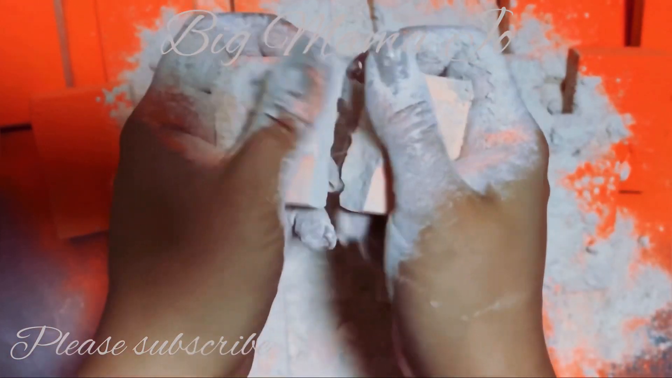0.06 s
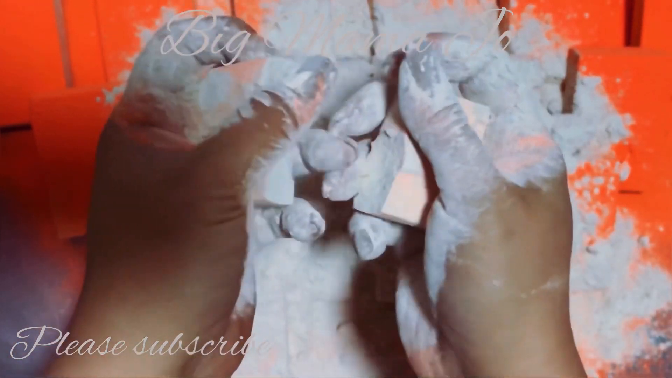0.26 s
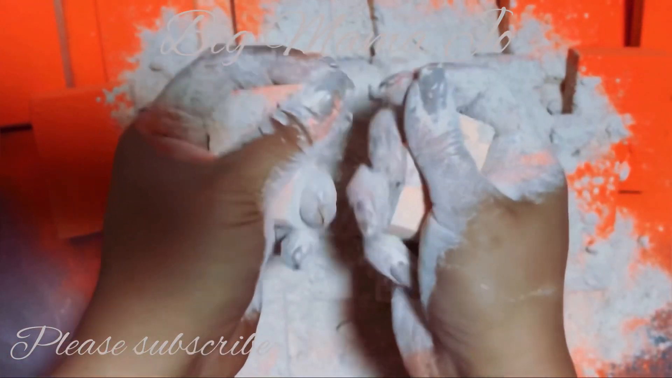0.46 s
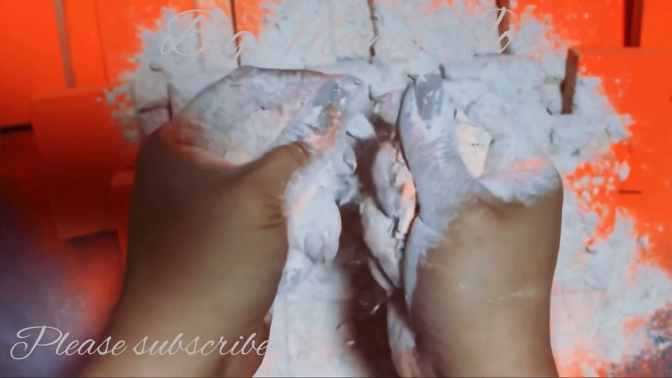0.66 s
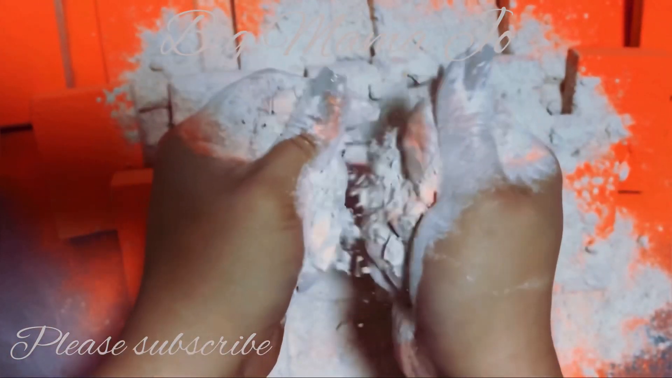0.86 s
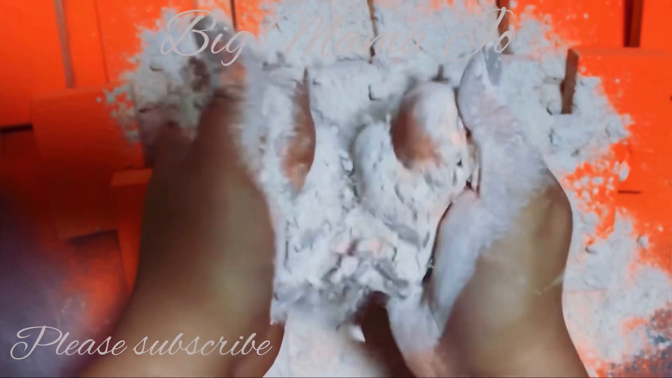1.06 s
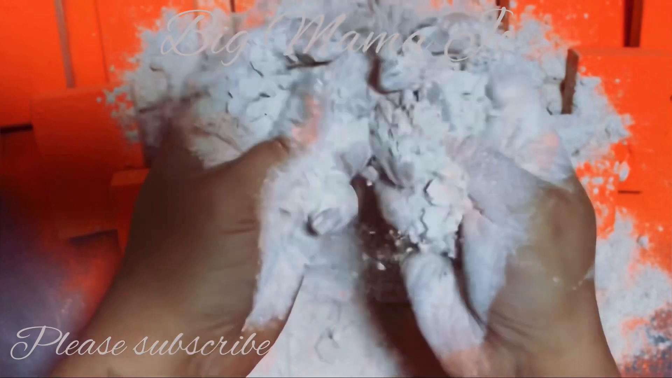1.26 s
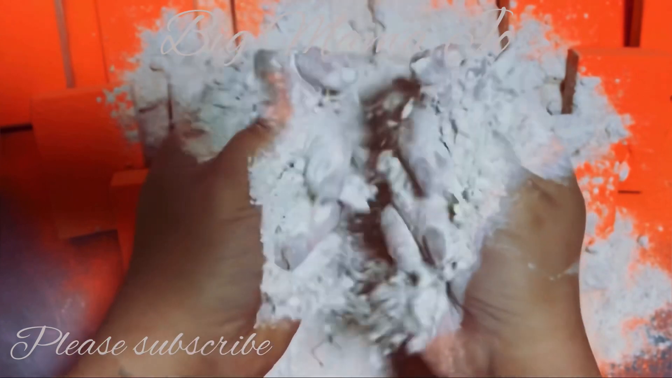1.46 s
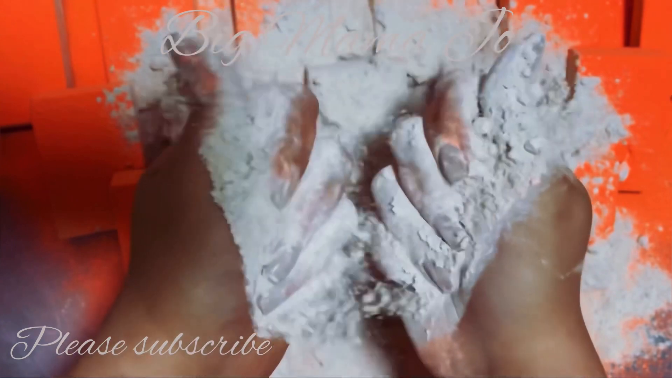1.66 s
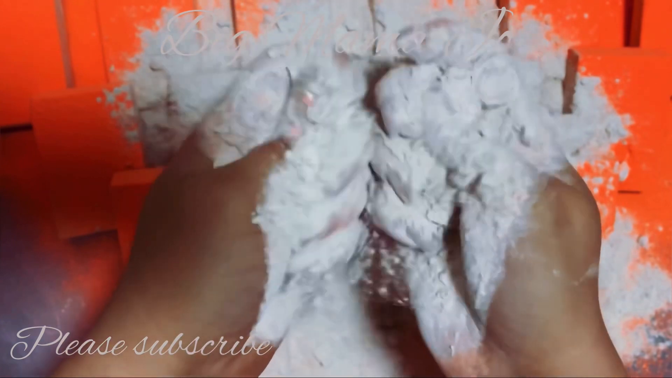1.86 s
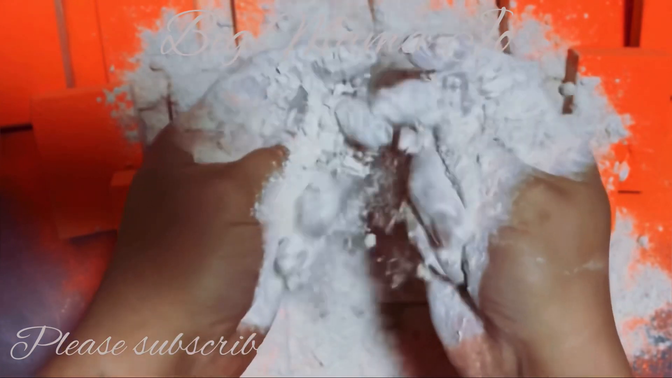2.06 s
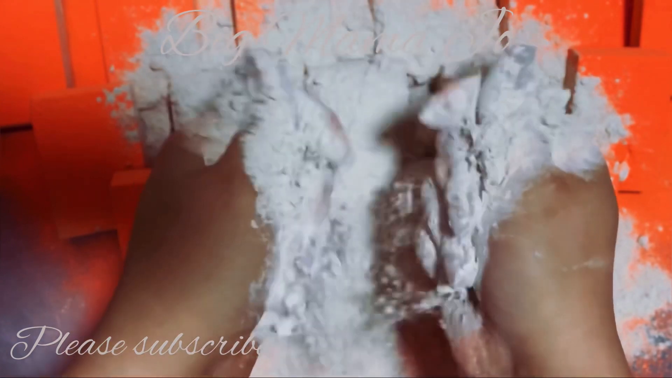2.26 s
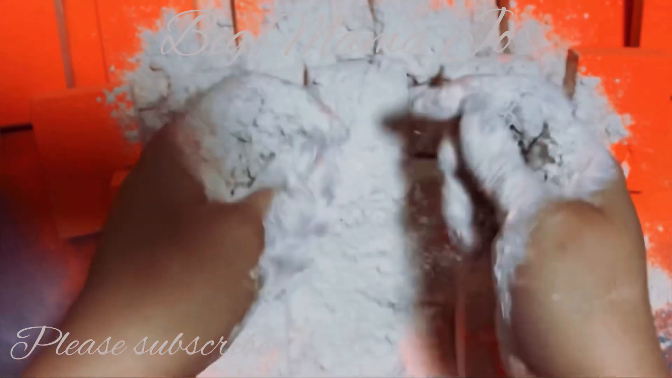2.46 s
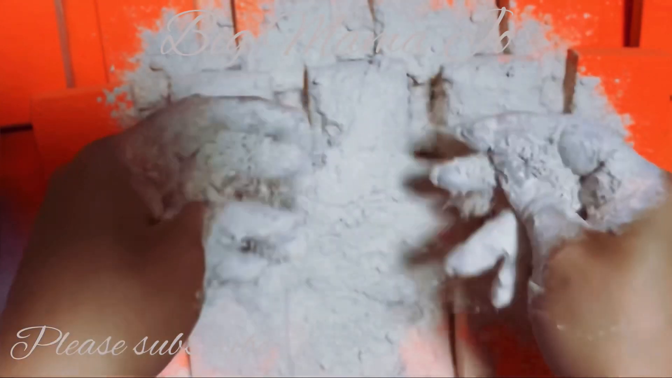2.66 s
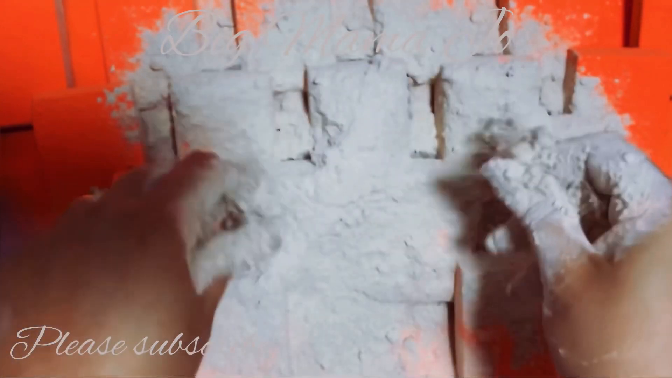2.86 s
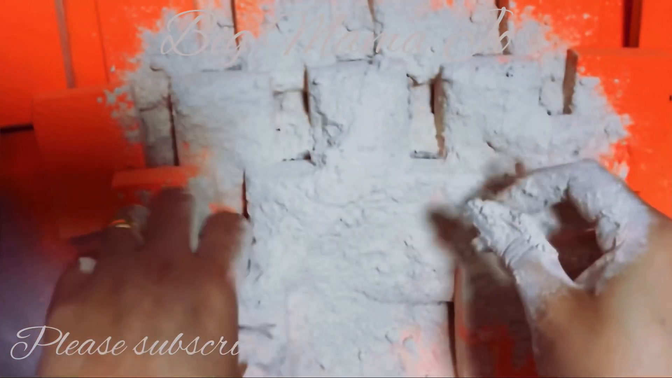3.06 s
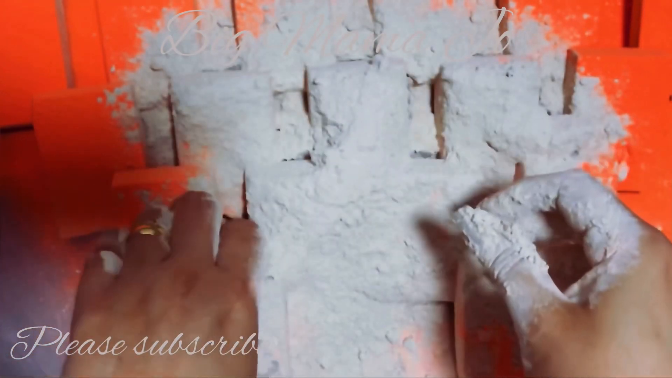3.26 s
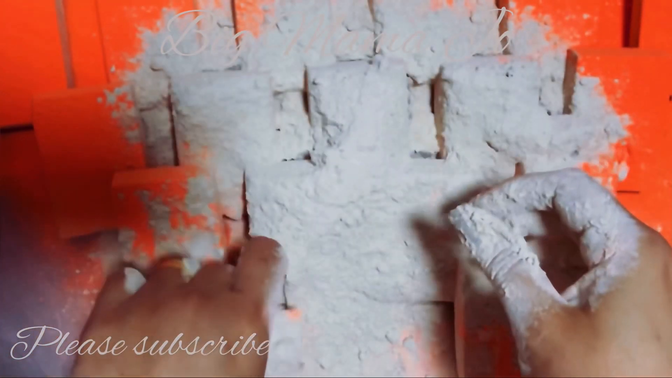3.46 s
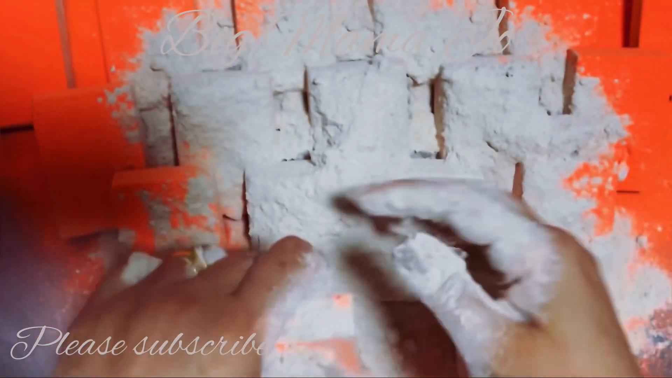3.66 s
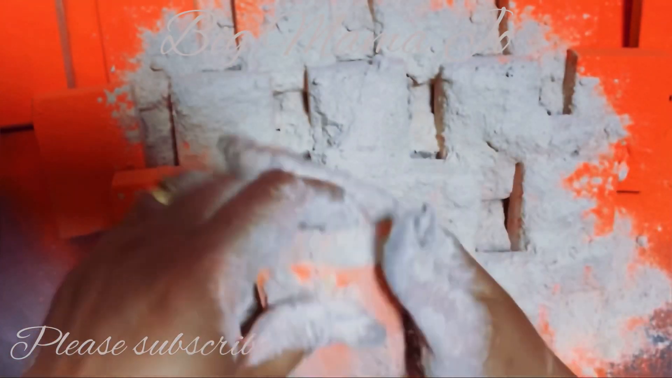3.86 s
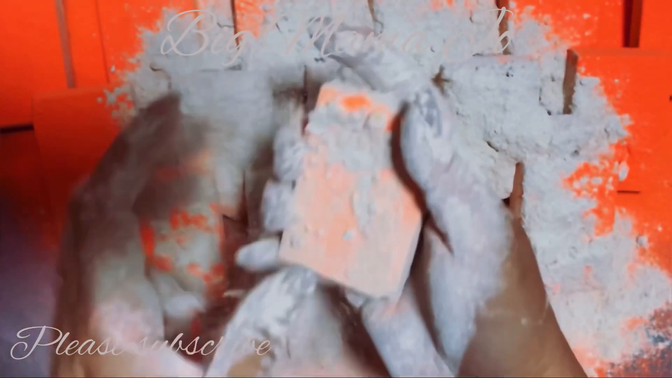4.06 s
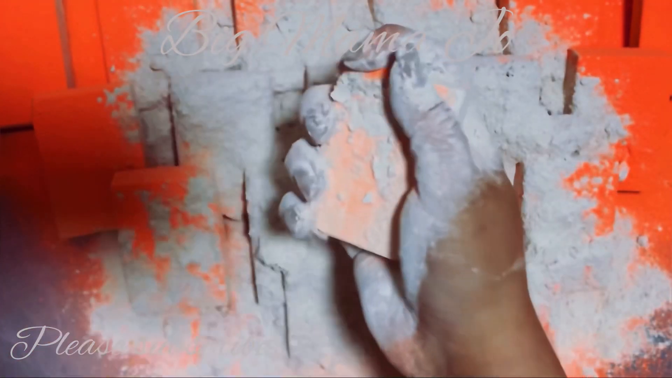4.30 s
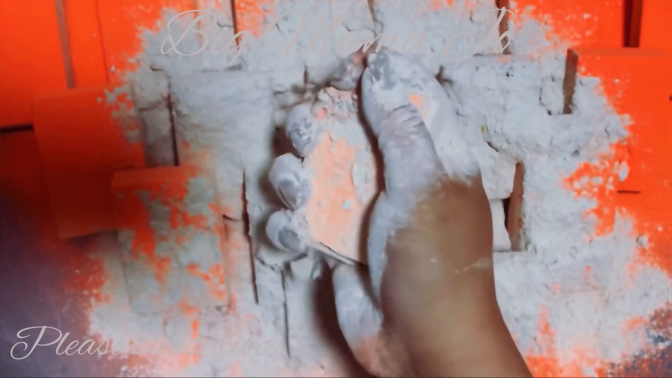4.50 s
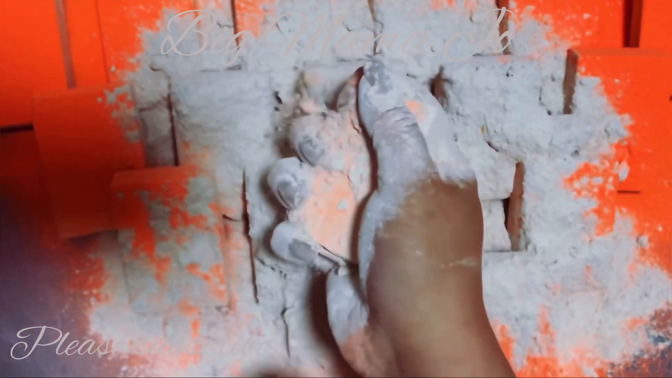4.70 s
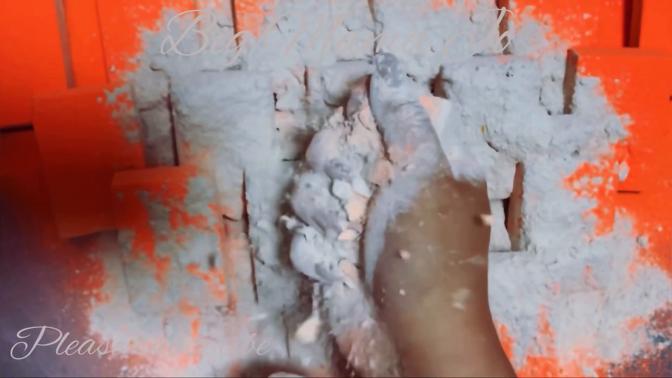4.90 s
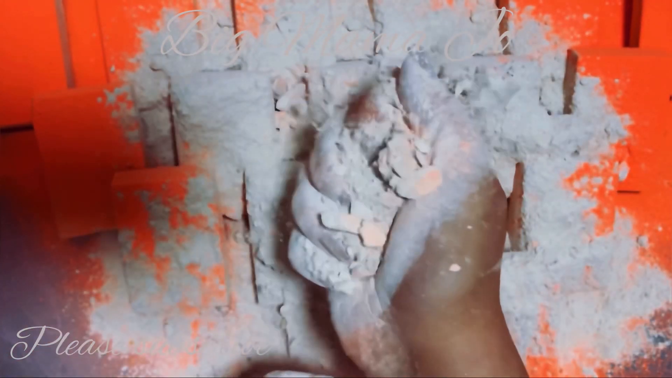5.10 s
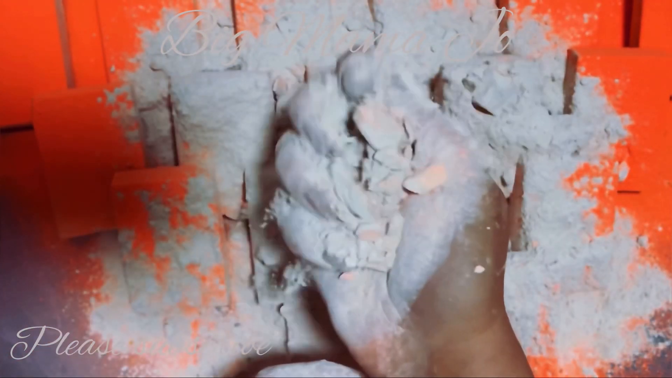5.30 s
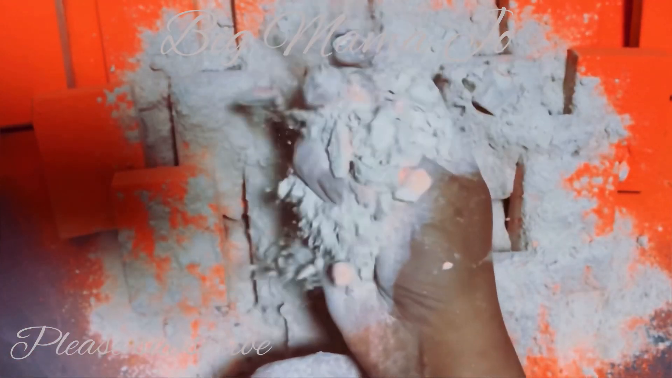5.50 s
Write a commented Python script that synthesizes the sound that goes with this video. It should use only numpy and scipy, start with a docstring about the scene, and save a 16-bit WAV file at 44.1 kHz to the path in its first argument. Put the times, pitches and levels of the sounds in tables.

```python
"""Crushing chalk by hand

Hands crush soft chalk blocks close to a phone. Powder pours and crumbs grind, made from grainy noise.
Lumps crack with a click, a short ring and a spray of noise; knocks and landing pieces thud lower down.
Room air, two noises with a hump in the low middle, lies under it all.
The phone's two microphone ports turn against each other in the treble."""
import sys
import numpy as np
from scipy import signal
from scipy.fft import rfft, irfft, next_fast_len
from scipy.io import wavfile
from scipy.ndimage import uniform_filter1d, map_coordinates

SR = 44100
rng = np.random.default_rng(int(sys.argv[2]) if len(sys.argv) > 2 else 0)


def unload_audio(sound):
    """Save the sound as a 16-bit wav file, at the path given as the first command line argument."""
    columns = np.transpose(np.atleast_2d(sound))
    # keep every value between -1 and 1, then stretch to whole-number steps
    steps = np.round(np.clip(columns, -1, 1) * 32767)
    wavfile.write(sys.argv[1], SR, steps.astype(np.int16))


N = 244314  # length in samples


def amp(db):
    """Turn decibels into a gain."""
    return 10 ** (np.asarray(db) / 20)


def unit(x):
    """Scale a sound to an rms of 1."""
    return x / np.sqrt(np.mean(x ** 2) + 1e-20)


def along(points, hz):
    """Read a table of (f/Hz, value) at any frequency, on a log axis."""
    f, value = np.transpose(points)
    return np.interp(np.log(hz + 1), np.log(f + 1), value)


def curves(rows):
    """Draw one curve over time for each column after t/s."""
    s, *columns = np.transpose(rows)
    return [np.interp(np.arange(N) / SR, s, column) for column in columns]


def wobble(rate):
    """A smooth random curve through so many random points a second."""
    points = rng.standard_normal(int(N * rate / SR) + 4)
    return map_coordinates(points, [np.arange(N) * rate / SR])


def filtered(x, response):
    """Multiply the spectrum of x by a response, which may also turn phases."""
    m = next_fast_len(x.shape[-1] + 8192)
    spectrum = rfft(x, m) * response(np.fft.rfftfreq(m, 1 / SR))
    return irfft(spectrum, m)[..., :x.shape[-1]]


def coloured(x, spectrum):
    """Give x the tone colour of a (f/Hz, level/dB) table, at rms 1."""
    return unit(filtered(x, lambda hz: amp(along(spectrum, hz))))


def band(lo_hz, hi_hz, x):
    """Keep mainly the pitches between two limits, at rms 1."""
    sos = signal.butter(2, [lo_hz, hi_hz], "bandpass", fs=SR, output="sos")
    return unit(signal.sosfilt(sos, x))


def grit(rate, spread_db, life, bed):
    """Noise bursts of uneven size, rate a second, fading over life seconds, on a smooth bed."""
    starts = (rng.random(N) < rate / SR) * amp(spread_db * rng.exponential(size=N))
    decay = np.exp(-1 / (life * SR))
    bursts = signal.lfilter([1], [1, -decay], starts)
    return (unit(bursts) + bed) * rng.standard_normal(N)


def patchy(x, depth_db):
    """Favour now one pitch, now another, in random patches that drift over time."""
    z = signal.stft(x, nperseg=512)[2]
    field = rng.standard_normal(z.shape)
    field = uniform_filter1d(field, size=4, axis=0)  # smooth over pitch
    field = uniform_filter1d(field, size=8, axis=1)  # smooth over time
    return signal.istft(z * amp(depth_db * unit(field)), nperseg=512)[1][:N]


# tone colour of the room air: (f/Hz, level/dB)
AIR_COLOUR = [(20, -40), (60, -30), (120, -20), (300, -15), (450, -9), (530, 0.5), (600, 3), (655, 4),
              (715, -1.5), (770, -6.5), (900, -16), (2500, -88), (9000, -50), (14000, -47)]


def room_air():
    """Room air: a wide, gently wavering rush of two noises with a hump in the low middle."""
    pair = np.array([coloured(patchy(rng.standard_normal(N), depth_db=1.5), AIR_COLOUR) for _ in range(2)])
    mid, side = pair * [[.9], [.45]]
    level_db = -42 + 1.4 * wobble(6.22)
    return amp(level_db) * np.array([mid + side, mid - side])


# how fast powder pours and rubs between the fingers: (t/s, level/dB)
POWDER_FLOW = [(0, -31), (.12, -24), (.3, -31), (.38, -31), (.46, -20.5), (.55, -25), (.89, -21.5),
               (.96, -19.5), (1.06, -25.5), (1.1, -20.5), (1.17, -17), (1.28, -31.5), (1.34, -23),
               (1.54, -17.5), (1.6, -22.5), (1.73, -22), (1.8, -15), (1.92, -31.5), (2.02, -24),
               (2.14, -18), (2.23, -19), (2.33, -17.5), (2.42, -27.5), (2.48, -35.5), (2.53, -26),
               (2.64, -26), (2.71, -17.5), (2.82, -32.5), (2.89, -53), (2.94, -29), (3.0, -27), (3.07, -42),
               (3.15, -47), (3.21, -61), (3.245, -47), (3.28, -45), (3.33, -60), (3.39, -25), (3.58, -44),
               (3.66, -42), (3.76, -53), (3.8, -26.5), (3.87, -19.5), (4.01, -35.5), (4.07, -28),
               (4.27, -32), (4.35, -36.5), (4.46, -39), (4.58, -28), (4.7, -38), (4.78, -27), (4.84, -36.5),
               (4.91, -36.5), (5.0, -23.5), (5.09, -34), (5.29, -30), (5.38, -36.5), (5.54, -29)]
# tone colour of the powder: (f/Hz, level/dB)
POWDER_COLOUR = [(1200, -34), (2500, -14), (4000, -7.5), (6000, -4.5), (9000, -0.5), (10300, 4.5),
                 (11500, -2.5), (16500, -5)]


def powder(squeeze):
    """Pouring powder: dense fine grains that hiss, louder as the hands squeeze."""
    flow_db, = curves(POWDER_FLOW)
    grains = grit(rate=1200, spread_db=2.5, life=0.0023, bed=1.5)
    hiss = coloured(patchy(grains, depth_db=2.0), POWDER_COLOUR)
    return amp(flow_db + 1.17 * squeeze) * hiss


# how hard the hands grind the lumps: (t/s, coarse crumb level/dB, fine crumb level/dB)
GRINDING = [(0, -55, -36), (.14, -61, -36.5), (.34, -61, -46), (.45, -40, -35), (.57, -36.5, -28.5),
            (.89, -41.5, -36), (1.06, -46, -38.5), (1.17, -35, -34.5), (1.28, -44, -33.5),
            (1.58, -37.5, -37), (1.73, -41.5, -35), (1.9, -45.5, -34), (2.2, -42.5, -37.5),
            (2.47, -49.5, -39.5), (2.71, -40.5, -42), (2.85, -43.5, -36.5), (2.97, -32, -36),
            (3.1, -50.5, -38.5), (3.16, -50, -52.5), (3.21, -60, -64), (3.25, -44.5, -37.5),
            (3.291, -57, -45.5), (3.34, -52.5, -52), (3.44, -36.5, -36), (3.66, -48, -42),
            (3.87, -55, -37.5), (4.01, -52, -41.5), (4.07, -46.5, -38.5), (4.3, -56, -45), (4.46, -55, -49),
            (4.6, -49, -36), (4.73, -48, -49), (4.78, -64, -25.5), (4.86, -61, -45.5), (5.0, -38.5, -31),
            (5.09, -45, -37.5), (5.29, -45.5, -38.5), (5.38, -49, -40.5), (5.54, -39.5, -37)]
# tone colour of the fine crumbs: (f/Hz, level/dB)
FINE_COLOUR = [(900, -37), (1700, -4.5), (2400, -1.5), (3600, -1), (5000, -4), (9000, -5), (14000, -36)]
# tone colour of the coarse crumbs: (f/Hz, level/dB)
COARSE_COLOUR = [(450, -19.5), (850, -3), (1300, -3), (1800, -9), (2600, -11.5), (5000, -55)]


def crumbs(squeeze):
    """Grinding crumbs: one stream of sparser grains, heard as a fine and a coarse layer."""
    coarse_db, fine_db = curves(GRINDING)
    grind = grit(rate=300, spread_db=2.0, life=0.0015, bed=1.68)
    fine = coloured(patchy(grind, depth_db=1.0), FINE_COLOUR)
    coarse = coloured(patchy(grind, depth_db=1.5), COARSE_COLOUR)
    return amp(1.65 * squeeze) * (amp(fine_db) * fine + amp(coarse_db) * coarse)


def grind_swing():
    """How far the coarse grinding is above or below its average, in dB."""
    coarse_db, _ = curves(GRINDING)
    return coarse_db - coarse_db.mean()


# tone colour of the rubbing palms: (f/Hz, level/dB)
PALM_COLOUR = [(130, -5.5), (215, -9.5), (250, -1), (320, -2.5), (395, 1), (480, -4), (600, -13),
               (1000, -81)]


def palms():
    """Rubbing palms: a low grainy bed that follows the grinding with a smaller swing."""
    rub = coloured(grit(rate=89, spread_db=0.0, life=0.0051, bed=1.0), PALM_COLOUR)
    return amp(-47 + 0.57 * grind_swing()) * rub


# resonances under the heap: (f/Hz, width/Hz, level/dB)
HEAP_MODES = [(121.4, 20, -6.5), (144.5, 12.4, -1.5), (199, 27, -3.5), (255, 29, -4), (289, 4.7, -26)]
# tone colour of the deep rumble: (f/Hz, level/dB)
RUMBLE_COLOUR = [(20, -45), (40, -24), (62, -3.5), (80, -1), (110, -12), (200, -52)]


def heap():
    """The heap: noise through low resonances, plus a deep rumble; both rise at each landing."""
    def modes(f):
        total = 0
        for k, (centre, width, db) in enumerate(HEAP_MODES):
            resonance = 1j * f * width / (centre * centre - f * f + 1j * f * width)
            total = total + (-1) ** k * amp(db) * resonance  # neighbours have opposite signs
        return total

    thud_gain, rumble_gain = landings()
    thuds = unit(filtered(rng.standard_normal(N), lambda f: modes(f) / (1 + (f / 320) ** 4)))
    rumble = coloured(rng.standard_normal(N), RUMBLE_COLOUR)
    bed = amp(-53 + 0.19 * grind_swing())
    return (bed + thud_gain) * thuds + (amp(-68) + rumble_gain) * rumble


def crushing():
    """Powder, crumbs, palms and heap together; one changing pressure drives powder and crumbs."""
    squeeze = wobble(20.97)  # pressure slips faster than the hands move
    return powder(squeeze) + crumbs(squeeze) + palms() + heap()


def small_breaks(count):
    """Many small breaks at random times, stronger when the coarse grinding is; columns as in LOUD_CRACKS."""
    s, coarse_db, _ = np.transpose(GRINDING)
    when, size, pitch, mix = rng.random((count, 4)).T
    when = when * s[-1]
    level_db = np.interp(when, s, coarse_db) + 9 + 6 * size
    hz = 2510 * 3 ** (pitch - .5)
    return np.transpose([when, level_db, hz, -16 + 14 * mix, np.full(count, -18)])


# loud cracks: (t/s, level/dB, lump pitch f/Hz, splinter level/dB, crumble level/dB)
# splinter and crumble levels add to the level of the crack
LOUD_CRACKS = [(0.322, -27, 2820, 4.5, -16), (0.338, -26.5, 3740, 4.5, -25), (0.383, -30, 3700, -10, -3),
               (0.396, -26, 1050, -20, -16), (0.399, -21, 2820, 3.5, -2), (0.418, -23.5, 1100, -20, -18),
               (0.421, -19, 2200, 3.5, -16), (0.454, -13.5, 2700, -7, -8.5), (0.456, -16, 1980, -6, -9),
               (0.47, -19, 2520, -17, -17), (0.492, -20, 3750, -24, -23), (0.515, -20, 1030, -12, -30),
               (0.516, -11.5, 1920, -11, -33), (0.517, -8, 3800, -20, -23), (0.544, -22, 2820, -18, -16),
               (0.57, -13.5, 1870, -13, -16), (0.572, -19, 1110, -18, -17), (0.572, -15, 3600, -16, -20),
               (0.572, -24, 4400, -17, -20), (0.582, -20, 1090, -25, -18), (0.613, -21, 2400, -5, -20),
               (0.614, -11.5, 3660, -4.5, -18), (0.687, -19.5, 1400, -7, -11),
               (0.689, -16.5, 2150, -4, -16), (0.691, -25, 1700, -20, -22), (0.758, -23.5, 1220, -24, -21),
               (0.758, -24, 2100, -20, -27), (0.779, -22, 1900, -15, -9), (0.904, -23, 2400, -12, -15),
               (0.912, -27, 940, -25, -8), (0.992, -25, 1610, -15, -10), (0.999, -16.5, 2190, -12, -17),
               (1.077, -29, 2400, -5, -10), (1.089, -13, 2620, -7, -14), (1.09, -17, 4300, -15, -16),
               (1.117, -14, 1016, -12, -14), (1.117, -15, 1690, -20, -18), (1.118, -15, 2800, -18, -15),
               (1.118, -15, 3600, -17, -18), (1.138, -21, 2200, -12, -10), (1.316, -23, 1720, -15, -4),
               (1.396, -23, 2270, -4, -11), (1.42, -15, 2480, -12, -20), (1.42, -23, 4200, -15, -20),
               (1.421, -20, 1400, -10, -14), (1.546, -19, 2100, -3, -5.5), (1.551, -25, 2700, -2, -12),
               (1.565, -24, 2480, -13, -12), (1.665, -21, 2580, -1, -9), (1.801, -25, 3920, 7, 5),
               (1.833, -21.5, 1500, -20, -5), (1.86, -24, 1740, -15, -10), (1.867, -14, 1760, -12, -8.5),
               (1.934, -23, 1740, -14, -17), (2.011, -15.5, 2610, -20, -12), (2.012, -18, 3700, -18, -14),
               (2.448, -28.5, 5550, 7.5, 7.5), (2.456, -19, 5530, -2, -16), (2.701, -37, 4300, -3, -25),
               (2.735, -16.5, 4400, -8, -5), (2.738, -24, 2970, 2, -17), (2.772, -20, 840, -7, -15),
               (2.773, -21.5, 1470, -18, -12), (2.773, -26, 2900, -13, -18), (2.824, -26, 1300, -21, -9),
               (2.852, -31, 1700, -13, -24), (2.878, -22, 2700, -13, -12), (2.891, -29, 2900, -17, -12),
               (2.91, -14, 2540, -8, -18), (2.911, -15, 5070, -11, -18), (2.926, -7.5, 2830, -9.5, -20),
               (2.926, -7, 3720, -20, -28), (2.927, -6, 4930, -19, -26), (2.926, -19, 7300, -19, -28),
               (2.936, -11.5, 1460, -20, -19), (2.937, -12, 2450, -20, -20), (2.937, -7.5, 3560, -16, -13),
               (2.945, -24, 2300, -15, -16), (2.952, -22, 3840, -21, -16), (2.983, -14.5, 3830, 1, -28),
               (2.983, -21, 1990, -12, -28), (3.002, -16.5, 3890, -14, -9.5), (3.043, -36, 1700, -21, -21),
               (3.047, -27, 776, -30, -7), (3.072, -20.5, 2570, -7, -14), (3.435, -2.5, 1840, -38, -23.5),
               (3.435, -11, 4800, -30, -24), (3.443, -16, 1530, -30, -20), (3.443, -19, 2850, -23, -11),
               (3.448, -17, 1800, -30, -14), (3.457, -28, 2600, -25, -18), (3.465, -17, 1900, -30, -19),
               (3.485, -22, 1630, -33, -16), (3.491, -19.5, 1840, -33, -11), (3.499, -22, 1900, -33, -20),
               (3.512, -35, 2000, -25, -18), (3.557, -18.5, 3840, -16, -13), (3.565, -25, 1710, -43, -24),
               (3.614, -32, 1700, -20, -20), (3.679, -33, 4500, 1, -27), (3.69, -22.5, 1420, -20, -4),
               (3.691, -28, 2600, -20, -14), (3.7, -28, 4800, -2, -8), (3.733, -22.5, 1050, -26, -6),
               (3.733, -24, 2500, -19, -22), (3.733, -16, 5160, -12, -22), (3.793, -37, 3980, 7, -3),
               (3.871, -24, 1610, -20, -10), (3.871, -20, 2970, 3, -8), (3.944, -26.5, 2750, 1.5, -3),
               (4.054, -27, 2280, -10, -6), (4.275, -29.5, 4280, 0, 3), (4.316, -32, 2310, -23, -23),
               (4.404, -32, 2970, -12, -4), (4.41, -28, 4500, -4, -8), (4.467, -41, 3000, 11, -3),
               (4.477, -30, 4400, 8.5, -20), (4.499, -27.5, 1770, -14, -2.5), (4.54, -23.5, 3660, 5, 0),
               (4.544, -25, 1900, -3, -5), (4.552, -22, 2270, -10, -23), (4.575, -16.5, 2130, 0, -8),
               (4.577, -11.5, 3840, -7, -15), (4.582, -13.5, 1550, -8, -14), (4.579, -13, 1620, -7, -23),
               (4.586, -15, 3860, -20, -24), (4.588, -22, 1700, -18, -24), (4.657, -30.5, 4970, 0, -12),
               (4.727, -32, 1800, 2, -6), (4.752, -6.5, 1300, -8.5, -18), (4.752, -8, 2120, -20, -20),
               (4.755, -15, 3700, 0, -15), (4.77, -16, 2300, -5, -9), (4.774, -14.5, 1310, -1.5, -13),
               (4.778, -15.5, 1230, -20, -21), (4.8, -31, 2060, -22, -14), (4.936, -18.5, 2750, -41, -10),
               (5.005, -12, 1460, -31, -10.5), (5.009, -16.5, 2590, -20, -18), (5.019, -19, 2550, -21, -6),
               (5.02, -23, 1600, -25, -9), (5.091, -21.5, 2100, -39, -9), (5.134, -22, 1530, 1, -19),
               (5.155, -25, 2900, -18, -3), (5.276, -30.5, 2840, -11, 2.5), (5.449, -30, 2200, -10, 2),
               (5.513, -18.5, 1470, -8, -12)]
RUN_MS = 0.647  # time a fracture takes to its peak
SNAP_CYCLES = .11  # sets the width of the click, in cycles of the lump's pitch
RING_RISE_MS, RING_CYCLES = .2, 25  # rise time; cycles in which the hand damps the ring by 60 dB
DUST_DB, DUST_S = -7.5, 0.09  # dust against the splinter gain; time to fade by 60 dB
CRUMBLE_S, LONGER_PER_DB = .11, 0.0765  # 60 dB fade of a -18 dB break; growth exponent per dB
ASIDE_S = 8e-6  # typical half lead of a break at the nearer port


def cracks():
    """Breaks: a click, a dull ring of the lump, a spray of splinters and dust, then a crumbling tail."""
    out, t = np.zeros((2, N + SR)), np.arange(SR // 5) / SR
    u = t * 1000 / RUN_MS
    swell = u * np.exp(1 - u)  # the fracture runs through the lump
    spray = band(4800, 21800, rng.standard_normal(N + SR))
    for s, db, hz, splinter_db, crumble_db in [*LOUD_CRACKS, *small_breaks(count=110)]:
        start = round(s * SR)
        noise = rng.standard_normal((3, len(t)))

        v = (t - RUN_MS / 2000) * hz / SNAP_CYCLES
        snap = amp(-3) * v * np.exp(.5 - v ** 2 / 2)

        rise = 1 - np.exp(-t * 1000 / RING_RISE_MS)
        damped = 1.3 * rise * amp(-60 * t * hz / RING_CYCLES)
        rough = .22 * band(hz * .4, hz * 2.4, noise[0]) * swell ** 2
        ring = np.sin(2 * np.pi * hz * t) * damped + rough

        dust = amp(DUST_DB - 60 * t / DUST_S)
        splinters = spray[start:][:len(t)] * amp(splinter_db) * (swell + dust)

        t60 = CRUMBLE_S * np.exp(LONGER_PER_DB * (db + 18.0))  # a louder break crumbles longer
        grains = unit(amp(4 * unit(uniform_filter1d(noise[1], size=60))))  # the tail is uneven, like crumbs
        bits = band(hz * .55, hz * 1.6, noise[2])  # crumbs ring near the pitch of their lump
        crumble = bits * grains * amp(crumble_db - 60 * t / t60) * (1 - np.exp(-t / 0.0032))

        sound = amp(db) * (snap + ring + splinters + crumble)
        half_lead = ASIDE_S * noise[1, 0]  # a random spot to the left or right
        side = half_lead * SR * np.gradient(sound)  # the slope stands in for a tiny time shift
        out[:, start:][:, :len(t)] += [sound, side]
    return out[:, :N]


# dull knocks of lumps in the hollow of the hands and on the heap:
# (t/s, level/dB, pitch f/Hz, time to die by 60 dB t/s before the closing fade)
DULL_KNOCKS = [(0.396, -17.5, 364, 0.037), (0.41, -31, 252, 0.19), (0.456, -21.5, 420, 0.027),
               (.66, -34.5, 204, .4), (0.571, -15, 750, 0.033), (0.633, -23.5, 397, 0.034),
               (0.756, -19.5, 810, 0.042), (1.116, -16, 792, 0.053), (1.12, -30, 298, 0.054),
               (1.14, -15.5, 149, 0.076), (1.17, -31, 141, .25), (1.546, -27.5, 285, 0.14),
               (1.52, -36, 207, .4), (1.599, -34, 150, .3), (1.8, -36, 132, .4), (2.739, -19.5, 296, 0.055),
               (2.933, -17.5, 780, 0.068), (3.437, -21, 852, 0.17), (3.441, -27, 484, 0.34),
               (3.49, -25, 137, 0.39), (3.485, -20, 420, 0.05), (3.699, -18.5, 274, 0.074),
               (3.71, -33, 136, 0.56), (3.729, -32, 246, 0.5), (3.732, -25.5, 327, 0.11),
               (3.908, -16.5, 584, 0.032), (3.912, -29, 128.6, 0.074), (4.055, -32, 327, 0.082),
               (4.574, -21, 297, 0.067), (4.751, -17.5, 304, 0.068), (4.776, -10, 273, 0.051),
               (4.8, -14, 274, 0.054), (5.004, -14, 713, 0.12), (5.009, -13.5, 292, 0.077),
               (5.019, -16, 643, 0.078), (5.029, -16, 618, 0.12), (5.045, -26.5, 398, 0.4),
               (5.517, -17, 310, 0.036)]


def knocks():
    """Soft blows: one broad push and a short, unsteady low ring."""
    out, t = np.zeros(N + SR), np.arange(SR // 4) / SR
    fade = 1 - t / t[-1]
    for s, db, hz, t60 in DULL_KNOCKS:
        # random phase drift: low rings stay clear, high ones are dull
        drift = np.cumsum(rng.standard_normal(len(t))) * hz / 6000
        push = .5 * np.sin(2 * np.pi * 450 * t) * amp(-60 * t / 0.022)
        shape = amp(-60 * t / t60) * (1 - np.exp(-t * hz / 1.66)) * fade
        ring = np.sin(2 * np.pi * hz * t + drift) * shape
        out[round(s * SR):][:len(t)] += amp(db) * (push + ring)
    return out[:N]


# pieces and hands landing on the heap: (t/s, thud level/dB, rumble level/dB, length/s)
HEAP_LANDINGS = [(0.43, -44, -56, 0.049), (0.575, -46, -57, 0.16), (0.774, -48, -55, .04),
                 (0.948, -65, -43, 0.047), (1.133, -36, -45, 0.078), (1.234, -60, -46, .06),
                 (1.612, -43, -45, 0.12), (1.793, -51, -58, 0.077), (2.267, -53, -54, 0.048),
                 (2.363, -57, -49, 0.13), (2.685, -47, -72, 0.031), (2.786, -48, -62, 0.051),
                 (2.94, -42, -60, 0.031), (3.022, -58, -39.5, 0.083), (3.47, -47, -38, 0.049),
                 (3.55, -55, -45, 0.082), (3.717, -41, -74, 0.062), (3.8, -48, -54, 0.042),
                 (3.918, -49, -58, 0.033), (4.097, -64, -74, 0.065), (4.588, -46, -55, 0.097),
                 (4.783, -38, -46, 0.075), (4.996, -48.5, -84, 0.17), (5.18, -64, -41, 0.051),
                 (5.53, -39, -51, 0.029)]


def landings():
    """Gains of thud and rumble: each landing swells and then dies away more slowly."""
    s, thud_db, rumble_db, length = np.transpose(HEAP_LANDINGS)
    late = (np.arange(N) / SR - s[:, None]) / length[:, None]
    late = np.where(late < 0, late / 0.55, late)  # the swell is shorter than the fall
    return amp([thud_db, rumble_db]) @ np.exp(-late ** 2)


# short rubs of block on block: (middle t/s, half length t/s, level/dB, pitch f/Hz)
BLOCK_RUBS = [(3.4, 0.02, -36, 2470), (3.7, 0.017, -34.5, 2400), (4.474, 0.0052, -40, 4300),
              (5, 0.0052, -32, 5000), (4.582, 0.01, -28, 4700), (3, 0.03, -35, 4200),
              (1.62, 0.018, -34, 2200), (0.47, 0.032, -30, 2500)]


def scrapes():
    """Rubs of block on block: brief swells of noise around one pitch."""
    out, t = np.zeros(N), np.arange(N) / SR
    for s, half, db, hz in BLOCK_RUBS:
        near = np.abs(t - s) < 3 * half
        rub = filtered(rng.standard_normal(N)[near], lambda f: 1 / (1 + ((f - hz) / (0.18 * hz)) ** 2))
        out[near] += amp(db) * unit(rub) * np.exp(-((t[near] - s) / half) ** 2)
    return out


# how alike left and right are for all but breaks and air: (f/Hz, likeness, 1 = the same)
LIKENESS = [(60, .96), (300, .98), (1200, .92), (1600, .985), (2500, .98), (3300, .95), (5500, .92),
            (8000, .97), (9500, .96)]


def scene():
    """Each break has its own spot; part of the crushing reaches each port from elsewhere in the hands."""
    chalk = np.array([crushing() + knocks() + scrapes(), crushing()])

    def shares(hz):
        angle = np.arccos(np.clip(along(LIKENESS, hz), -1, 1)) / 2
        return np.array([np.cos(angle), np.sin(angle)])

    mid, side = filtered(chalk, shares) + cracks()
    return np.array([mid + side, mid - side]) + room_air()


# phase between the microphone ports: (f/Hz, radians by which left leads)
PORT_PHASE = [(30, .45), (100, .4), (200, .25), (400, .3), (600, .6), (1000, .4), (1500, .1), (2400, 0),
              (3500, -.4), (5800, -.6), (6400, -.15), (7400, -.25), (8000, -.5), (8800, 0), (9200, 1.2),
              (10350, np.pi), (11400, 5.3), (11800, 2 * np.pi), (12300, 2 * np.pi), (13200, 9),
              (13800, 3 * np.pi), (14600, 4 * np.pi)]
# loudness of the microphones over pitch: (f/Hz, level/dB)
MIC_COLOUR = [(20, -31), (45, -3.5), (11500, -3.5), (12400, -15.5), (13000, -32), (14400, -30),
              (15700, -28)]


def record(dry):
    """The ports turn phases in opposite directions; the high treble is weak and stops at 15900 Hz."""
    def response(hz):
        turn = np.exp(.5j * np.outer([1, -1], along(PORT_PHASE, hz)))
        return turn * amp(along(MIC_COLOUR, hz)) * (hz < 15900)

    return filtered(dry, response)


dry = scene()
out = record(dry)
unload_audio(out)
```